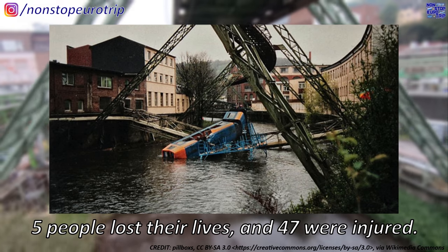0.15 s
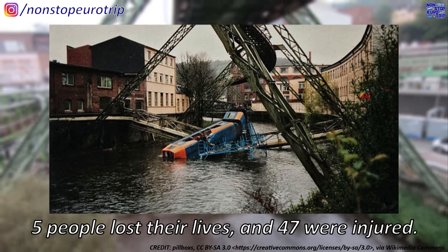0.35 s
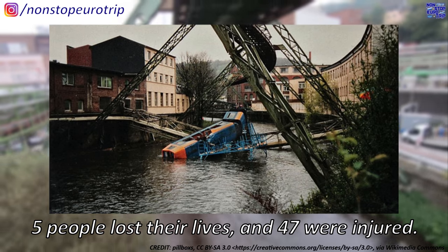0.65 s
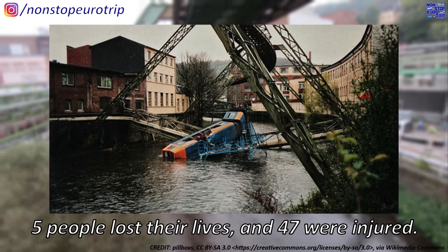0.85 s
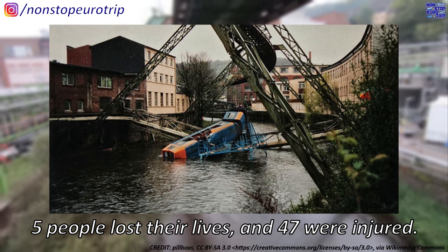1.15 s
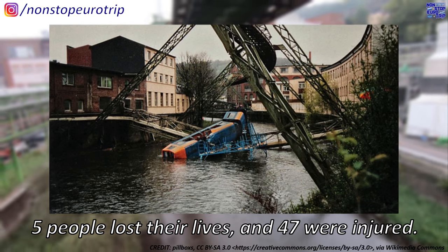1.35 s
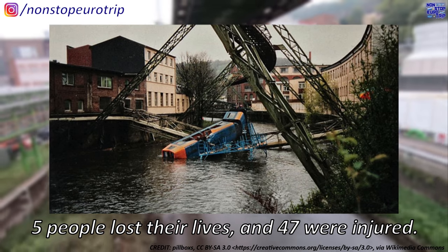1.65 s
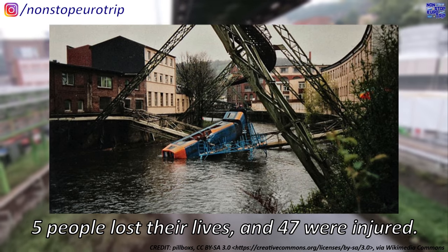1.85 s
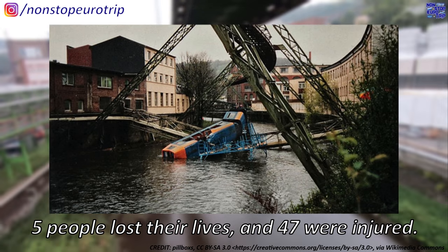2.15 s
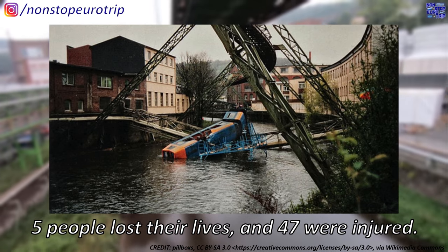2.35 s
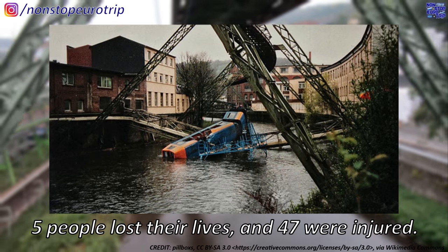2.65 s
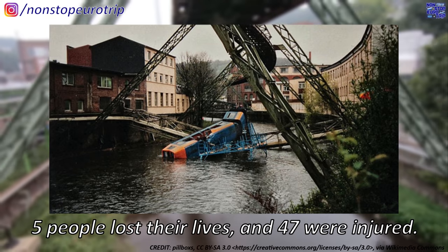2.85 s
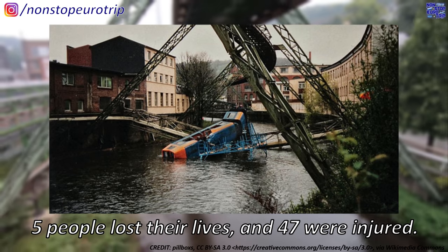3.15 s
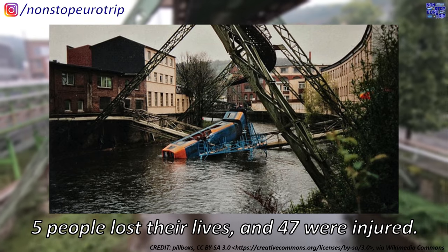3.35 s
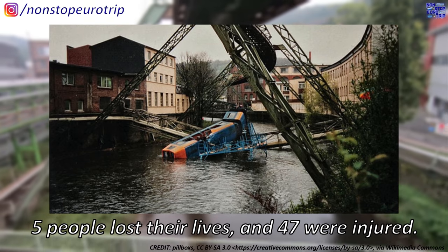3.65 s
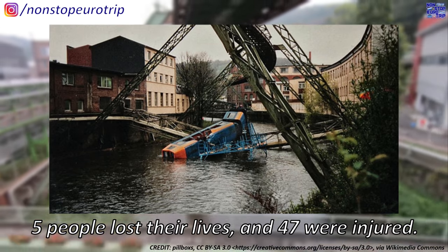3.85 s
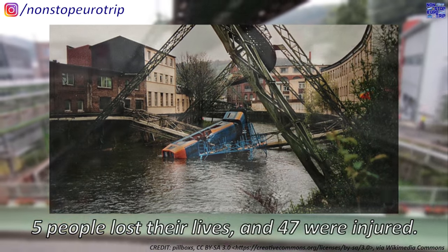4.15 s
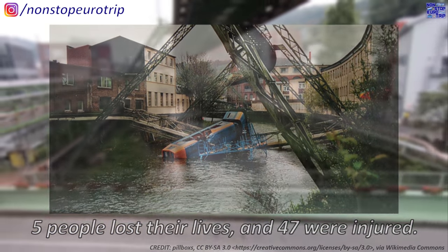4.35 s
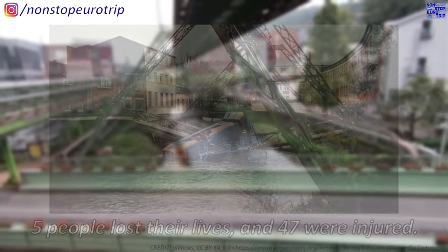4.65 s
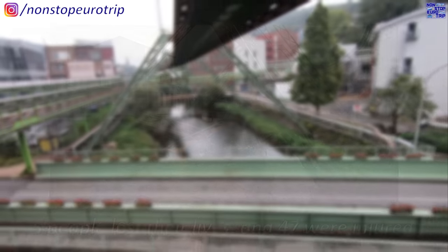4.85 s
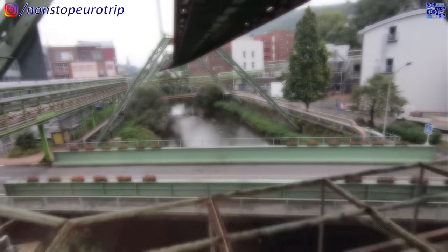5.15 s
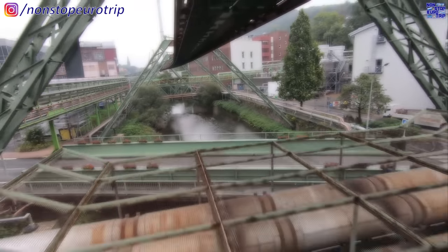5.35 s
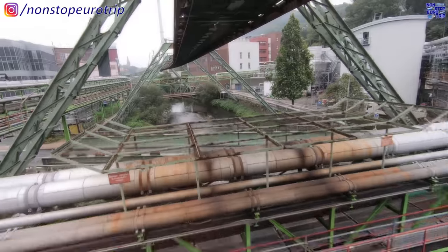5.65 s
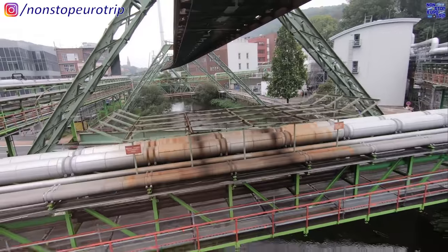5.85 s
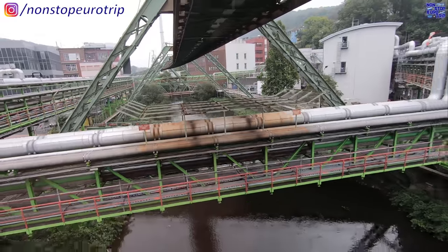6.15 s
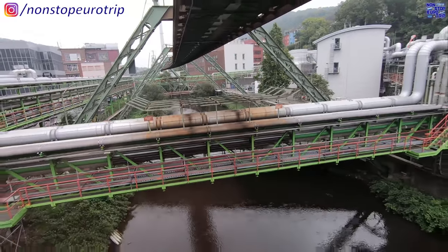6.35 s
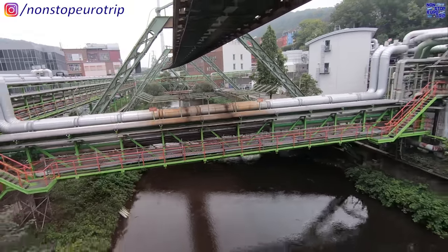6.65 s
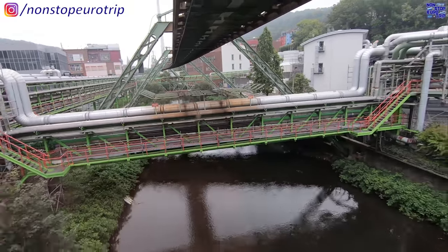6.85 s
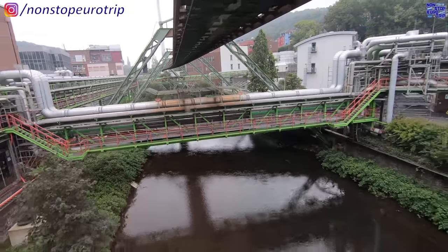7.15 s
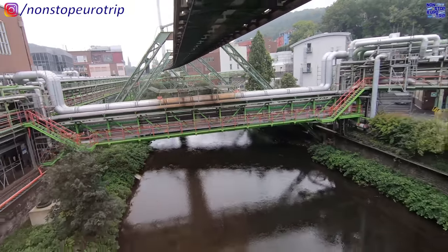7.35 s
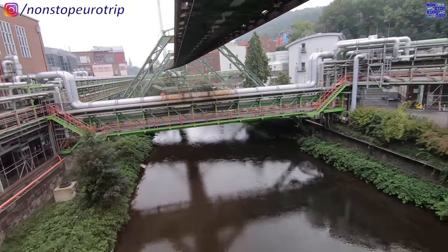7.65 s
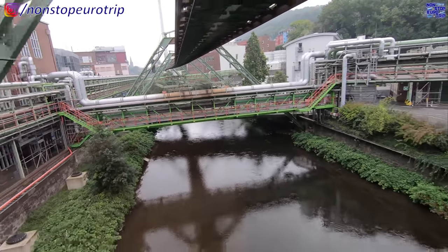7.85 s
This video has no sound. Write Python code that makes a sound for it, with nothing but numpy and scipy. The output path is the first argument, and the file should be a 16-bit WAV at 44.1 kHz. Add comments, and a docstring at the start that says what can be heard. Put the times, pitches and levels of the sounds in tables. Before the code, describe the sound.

Steady ride heard from within a hanging monorail car, microphones in the enclosed cabin. Deep bass boom and murky panel drone never stop, rising and falling with rough rail. Over them lie faint hiss, buzzing trim and a wavering high whine. Soft thuds, dull knocks and light ticks come irregularly, clustering before halfway; short high squeaks follow, then late plate clinks over rougher rolling.

```python
"""Inside a suspended monorail car at steady speed: from start to end, steel wheels on the rail overhead force the
hanging body's low modes to boom, panels drone, contacts buzz in the trim, and a motor whines thinly over a hiss.
Fittings tick, knock and thud from about 0.45 s; rubbing parts squeak at 1.8 s; the drone roughens near 2.3 s.
Knocks crowd from 3.5 to 4.1 s, squeaks follow to 4.7 s and one more at 5.9 s; near 7.5 s a loose plate clinks
as rougher rail passes. Noise drives resonances, sines make the tones; microphones and a limiter hear the sum."""
import sys
import numpy as np
from scipy import signal
from scipy.fft import rfft, irfft
from scipy.io import wavfile
from scipy.ndimage import uniform_filter1d, minimum_filter1d

SR = 44100
rng = np.random.default_rng(int(sys.argv[2]) if len(sys.argv) > 2 else 0)


def master(y):
    """Save y as 16-bit WAV."""
    cut = np.clip(np.atleast_2d(y).T, -1, 1)
    pcm = np.round(cut * 32767)  # scale
    wavfile.write(sys.argv[1], SR, pcm.astype(np.int16))


N = 353241
HZ = np.maximum(np.fft.rfftfreq(N, 1 / SR), 1)   # FFT bin frequencies, kept above zero for the logarithm

# Lowest resonances of the hanging body: centre_hz [Hz], width_hz [Hz], level_db [relative dB]
SWAY_MODES = [(18.7, 7, -9), (28, 10, -2), (41.7, 5.9, 0.5), (60.9, 19, -3), (75, 12, -10.5)]
# Booming resonances of the body: centre_hz [Hz], width_hz [Hz], level_db [relative dB]
BODY_MODES = [(95.1, 19.5, 3.5), (112, 5.7, 3.5), (135.5, 31, -6.5)]
# Resonances of the floor: centre_hz [Hz], width_hz [Hz], level_db [relative dB]
FLOOR_MODES = [(164.6, 18.5, -1), (187.6, 18.6, -2.5)]
# Resonances of the panels: centre_hz [Hz], width_hz [Hz], level_db [relative dB]
PANEL_MODES = [(230.7, 35, -5.5), (296.6, 29, -0.5), (326.4, 32, -4), (386.2, 36.5, -4.5), (444.5, 36, -10)]
# Resonances heard in the rolling noise: centre_hz [Hz], width_hz [Hz], level_db [relative dB]
ROLLING_MODES = [(517.5, 79, 5), (611, 46, 9), (688, 320, 3), (792, 280, -0.5), (960, 100, -12.5)]
# Course of the floor's hum: time_s [s], level_db [relative dB]
FLOOR_LEVEL = [(0.0, -21.5), (0.13, -37.5), (0.22, -26), (0.31, -35), (0.71, -24), (0.84, -32.5),
               (0.87, -30.5), (2.16, -23.5), (2.2, -16), (2.32, -25), (2.67, -21), (2.96, -30.5),
               (5.64, -29.5), (6.02, -26), (6.08, -32.5), (6.71, -27.5), (6.79, -35.5), (6.86, -20.5),
               (6.97, -36), (7.11, -21), (7.22, -32), (7.26, -24.5), (7.89, -31.5), (8.0, -52)]


def car_body():
    """Forced vibration: rail roughness drives each group of modes with noise; little passes above them."""
    drone_db, sway_db, boom_db, _ = rail_state()
    boom_lift, drone_lift, *_ = jolts()
    floor_db = in_time(FLOOR_LEVEL)[0] + 0.35 * boom_lift - 0.6
    panel_db = drone_db + drone_lift - 1.8 + 0.61 * drift(15)
    rolling_db = -47.5 + 0.79 * (drone_db - drone_db.mean() + drone_lift) + 0.53 * drift(2.6)
    # modes, skirt steepness, level [dB], throb per wheel turn [dB], own random surge [dB]
    groups = [(SWAY_MODES, 1.2, sway_db - 0.5, 1.2, 0.2),
              (BODY_MODES, 1.8, boom_db + boom_lift - 2.5, 1.1, 1.3),
              (FLOOR_MODES, 1.8, floor_db, 2.2, 1.1),
              (PANEL_MODES, 1.5, panel_db, 1.5, 1.2),
              (ROLLING_MODES, 2.2, rolling_db, 1.1, 0.9)]
    shared_surge_db = 0.54 * drift(26.0)   # uneven rail shakes all groups together
    out = 0
    for modes, steep, level_db, throb_db, surge_db in groups:
        mass_rolloff = 1 / (1 + (HZ / modes[-1][0] / 2) ** 4)
        vibration = heard(rng.standard_normal((2, N)), modes_gain(modes, steep) * mass_rolloff)
        swing_db = shared_surge_db + surge_db * drift(9.0) + throb_db * wheel_throb()
        out = out + amp(level_db + swing_db) * vibration
    return out


# State of the rail: time_s [s], then the levels it gives to drone_db, sway_db, boom_db, rattle_db [relative dB]
RAIL = [(0.0, -37.5, -18, -19, -60), (0.13, -38.5, -19.5, -19.5, -61.5), (0.93, -34.5, -18, -19.5, -57.5),
        (1.56, -32.5, -20, -15.5, -57), (1.87, -36, -19, -19, -56), (2.27, -31, -15.5, -15, -56),
        (2.78, -38.5, -21, -20, -60.5), (4.1, -37.5, -16.5, -21.5, -60), (4.32, -42.5, -18, -24.5, -62),
        (4.7, -34.5, -20, -13.5, -56.5), (4.99, -41, -20.5, -22, -63), (5.19, -36.5, -19.5, -20.5, -60.5),
        (5.44, -37.5, -19, -23, -60.5), (5.99, -38.5, -17.5, -24.5, -57.5),
        (6.24, -39.5, -20.5, -19, -59.5), (7.2, -36.5, -20.5, -21, -58), (7.44, -30.5, -18, -14.5, -56.5),
        (8.0, -43, -22.5, -25.5, -63.5)]


def rail_state():
    """Excitation by roughness: drone, sway, boom and rattle levels follow the rail along the ride."""
    return in_time(RAIL)


# Jolts over uneven spots: centre_s [s], length_s [s],
# then boom_lift_db, drone_lift_db, trim_lift_db, fine_lift_db [dB before each group's weighting]
JOLTS = [(0.285, 0.12, 2, 0, 7.5, 4), (0.529, 0.12, 6.5, 5.5, 4, 0), (0.657, 0.11, 2.5, 5.5, 1.5, 2),
         (1.596, 0.19, -4, -3, 2, 5), (1.78, 0.19, 3, 0.5, 5.5, 3.5), (2.046, 0.11, 2, 1.5, 5, 1),
         (2.131, 0.084, 3, 5, 0, -5), (2.257, 0.087, 1.5, -6, 1, 6), (2.404, 0.096, -11, -2, 4, -2),
         (2.7, 0.19, -2, -2.5, 0, -3), (2.732, .09, 2, -2, 4, 5), (2.868, 0.069, 4, 2.5, 2.5, 2),
         (3.33, 0.11, -0.5, 3.5, -0.5, 3), (3.408, 0.39, 2.5, -0.5, 5.5, 2.5), (3.765, 0.067, 5, -4, 6, 3),
         (3.913, 0.15, 4.5, 8.5, 3, -1), (4.01, 0.29, 1, 1.5, 6.5, 5), (4.15, 0.08, -1, 1, 7, 5),
         (4.678, 0.26, -0.5, 5, 3.5, 9.5), (5.17, 0.144, 2.5, -1.5, 2, 2), (5.838, 0.18, 9, 6.5, 7, 4),
         (5.979, 0.18, 9.5, 8.5, 4, 4), (6.774, 0.19, 3.5, 1.5, 4.5, 4), (6.962, 0.08, 0.5, 0, -12, 8.5),
         (7.074, 0.15, -0.5, 3.5, 5.5, 3), (7.34, 0.16, 3.5, -1, 5.5, 6), (7.505, 0.26, -3.5, -1, 6, 3),
         (7.595, 0.17, 6, 2, 0, 4)]


def jolts():
    """Transient excitation: each jolt raises or lowers levels in a raised-cosine hump; one track per lift."""
    t = np.arange(0, N, 64) / SR   # a coarse time grid is enough for smooth humps
    rows = np.array(JOLTS)
    centre_s, length_s = rows[:, :1], rows[:, 1:2]
    humps = np.cos(np.pi * np.clip((t - centre_s) / length_s, -0.5, 0.5)) ** 2
    return [np.interp(np.arange(N) / SR, t, lift) for lift in rows[:, 2:].T @ humps]


WHEEL_HZ = 4.52           # turns a second of a slightly out-of-round wheel
WHEEL_HIGH_S = 0.0067     # first moment its high side meets the rail


def wheel_throb():
    """Periodic forcing: an out-of-round wheel swings the drive from -1 to 1 once per turn."""
    return np.cos(2 * np.pi * WHEEL_HZ * (np.arange(N) / SR - WHEEL_HIGH_S))


# Resonances of the trim: centre_hz [Hz], width_hz [Hz], level_db [relative dB]
TRIM_MODES = [(1110, 720, 2), (1440, 390, -10), (2220, 1230, -6)]
# Resonances of the chirring fittings: centre_hz [Hz], width_hz [Hz], level_db [relative dB]
CHIRR_MODES = [(2920, 1800, 20.5), (3800, 800, -26.5)]
# Resonances of the fine rattle: centre_hz [Hz], width_hz [Hz], level_db [relative dB]
FINE_MODES = [(5330, 6000, -0.5), (7050, 2300, 0), (9250, 1500, -3.5)]


def fittings():
    """Random impact excitation: dense small contacts ring the trim, in clumps, with rail and jolts."""
    rattle_db = rail_state()[3]
    swing_db = rattle_db - rattle_db.mean()
    *_, trim_lift, fine_lift = jolts()
    fine_db = -73 + 0.7 * swing_db + fine_lift + 0.68 * wheel_throb()
    # modes, contacts a second, spread of contact sizes [dB], level [dB]
    groups = [(TRIM_MODES, 300, 3.2, -60.5 + 1.1 * swing_db + trim_lift),
              (CHIRR_MODES, 400, 3.2, -68 + 0.64 * swing_db + 0.64 * fine_lift),
              (FINE_MODES, 500, 4.0, fine_db)]
    out = 0
    for modes, per_s, spread_db, level_db in groups:
        ringing = heard(contacts(per_s, spread_db), modes_gain(modes, 1.74))
        clumps_db = 1.9 * drift(38) + 0.5 * drift(15.0)
        out = out + amp(level_db + clumps_db) * ringing
    return out


def contacts(per_s, spread_db):
    """Shot noise: random contacts of uneven size over a smooth noise bed."""
    sizes = amp(spread_db * np.minimum(rng.exponential(1, N), 4))
    touch = 1 + sizes * (rng.random(N) < per_s / SR)
    return rng.standard_normal((2, N)) * touch


# Single dull knocks of fittings: start_s [s], level_db [dB before trim], pitch_hz [Hz]
KNOCKS = [(0.45, -36, 1130), (1.5294, -37, 1210), (2.016, -36, 1110), (2.4059, -39, 1150),
          (2.8499, -38.5, 1180), (3.458, -33.5, 900), (3.766, -35.5, 1000), (3.958, -32, 850),
          (4.148, -40, 1240), (5.945, -34, 1000), (6.5605, -41, 1210), (7.0753, -41, 1310),
          (7.3298, -40, 1220)]
# Light ticks of small metal parts: start_s [s], level_db [dB before trim]
TICKS = [(0.4494, -51), (1.5874, -50), (1.642, -56), (1.7894, -50), (2.0294, -57), (2.0697, -54),
         (2.17, -49), (2.2483, -52), (2.4039, -50), (2.4977, -51), (2.645, -54), (2.8494, -56),
         (3.465, -55), (3.5425, -47), (3.7693, -49), (4.1475, -47), (4.6, -53), (4.625, -50), (4.655, -51),
         (4.69, -54), (5.902, -49), (5.9968, -45), (6.9594, -57), (7.3257, -45), (7.4245, -45),
         (7.4694, -48), (7.5368, -46), (7.6001, -54)]
TICK_HZ = 7000
# Clinks of a loose plate: start_s [s], level_db [dB before trim]
CLINKS = [(7.4944, -44), (7.5088, -44), (7.5293, -49), (7.5354, -50)]
# What the loose plate rings with: centre_hz [Hz], width_hz [Hz], level_db [relative dB]
PLATE_MODES = [(1970, 42, 2), (2050, 45, 2.5), (2210, 52, 3)]
# Thuds from the rail into the panels: start_s [s], level_db [dB before trim]
THUDS = [(0.53, -16), (0.89, -24), (1.067, -24), (1.287, -28), (1.688, -36), (1.961, -23), (2.178, -20),
         (2.406, -20.5), (2.849, -30), (3.813, -35), (3.936, -28), (4.592, -20.5), (6.449, -22),
         (6.544, -33), (7.061, -29), (7.525, -33)]


def knocks():
    """Impact and free decay: dull knocks and light ticks as noise bursts, clinks and thuds as struck modes."""
    dull = bursts(KNOCKS, t60=0.061, width=0.9, wide=0.49, trim_db=-5.0, rise_s=0.006, grain_db=2.5)
    clinks = struck(CLINKS, PLATE_MODES, soft_hz=5000, trim_db=-7)
    thuds = struck(THUDS, PANEL_MODES, soft_hz=600, trim_db=-4.0)
    tick_rows = [(s, db, TICK_HZ) for s, db in TICKS]
    ticks = bursts(tick_rows, t60=0.065, width=0.31, wide=0.75, trim_db=-9, rise_s=0.0042, grain_db=4.0)
    return dull + clinks + thuds + ticks


def bursts(rows, t60, width, wide, trim_db, rise_s, grain_db):
    """Exponential decay: each row (s, dB, Hz) is a noise band, width octaves to each side, dying by 60 dB in t60."""
    t = np.arange(6000) / SR
    noise = rng.standard_normal((len(rows), 2, len(t)))
    grains = rng.standard_normal((len(rows), 1, len(t) // 60)).repeat(60, axis=2)
    noise = noise * amp(grain_db * grains)   # crackles in short grains
    out = np.zeros((2, N + len(t)))
    for (s, db, hz), (mid, side) in zip(rows, noise):
        band = signal.butter(2, [hz * 2 ** -width, hz * 2 ** width], "band", fs=SR, output="sos")
        pair = rms_one(signal.sosfilt(band, [mid + wide * side, mid - wide * side]))
        envelope = amp(db + trim_db - 60 * t / t60) * np.minimum(t / rise_s, 1)
        start = round(s * SR)
        out[:, start:start + len(t)] += pair * envelope
    return out[:, :N]


def struck(rows, modes, soft_hz, trim_db):
    """Modal impulse response: each row (s, dB) strikes every mode with a soft blow of its own strength."""
    s, db = np.transpose(rows)
    luck_db = rng.normal(0, 1.2, (len(s), len(modes)))
    out = np.zeros(N)
    for k, (hz, width, level_db) in enumerate(modes):
        blows = np.full(N, 1e-18)   # a tiny floor instead of exact silence
        blows[(s * SR).astype(int)] = amp(db + level_db + trim_db + luck_db[:, k])
        r, w = np.exp(-np.pi * width / SR), 2 * np.pi * hz / SR   # pole radius and angle
        ringing = signal.lfilter([0, np.sin(w)], [1, -2 * r * np.cos(w), r * r], blows)
        out += ringing * (-1) ** k   # neighbouring modes in opposite sign
    return signal.sosfilt(signal.butter(2, soft_hz, fs=SR, output="sos"), out)


# Brief squeaks: start_s [s], length_s [s], first_hz [Hz], last_hz [Hz], level_db [dB of peak amplitude before raggedness]
SQUEAKS = [(1.779, 0.13, 3190, 3110, -58.5), (3.95, 0.065, 3230, 3300, -59), (4.33, 0.035, 3220, 3270, -57),
           (4.522, 0.085, 3120, 3180, -59.5), (4.607, .05, 3180, 3300, -59),
           (5.857, 0.097, 3310, 3170, -59)]


def squeaks(rough=0.39, jitter=0.6):
    """Friction-driven tone: rubbing parts sing briefly in a glide, ragged in level and phase (jitter, radians)."""
    t = np.arange(N) / SR
    out, ragged = np.zeros(N), jitter * drift(90)
    for s, length, first_hz, last_hz, db in SQUEAKS:
        part = np.clip((t - s) / length, 0, 1)
        phase = 2 * np.pi * np.cumsum(first_hz + (last_hz - first_hz) * part) / SR
        swell = np.sqrt(np.sin(np.pi * part).clip(0))
        out += amp(db) * swell * np.sin(phase + ragged)
    return out * (1 + rough * np.array([drift(45), drift(45)]))


SHAFT_HZ, WHINE_ORDER = 56.07, 52   # shaft turns a second; multiple of it that whines
# Motor whine, swelling and fading: time_s [s], level_db [dB rms before flutter and waver]
WHINE = [(0.02, -56), (0.06, -60.5), (0.35, -70), (0.4, -55), (0.49, -68), (0.55, -58), (0.73, -66),
         (0.77, -56), (0.89, -68.5), (1.2, -64.5), (1.22, -73), (1.35, -72), (1.42, -62), (1.69, -68.5),
         (1.75, -62), (2.17, -72), (2.24, -61), (2.44, -76), (2.51, -61.5), (2.71, -67.5), (3.09, -61),
         (3.2, -69), (3.29, -54), (3.33, -67), (3.37, -61), (3.49, -68), (3.53, -74), (3.55, -63),
         (3.86, -61.5), (3.91, -80), (3.95, -60), (4.09, -56), (4.13, -70), (4.18, -52), (4.22, -62.5),
         (4.4, -72), (4.49, -60), (4.6, -70), (5.0, -63), (5.09, -68), (5.15, -57), (5.24, -70),
         (5.93, -61), (6.07, -71), (6.09, -59.5), (6.35, -71), (6.53, -70), (6.58, -59), (6.8, -73.5),
         (6.84, -60), (6.93, -67), (7.02, -57), (7.04, -67), (7.27, -63), (7.46, -69), (7.49, -65),
         (7.71, -69), (7.84, -65), (7.96, -68), (8.0, -65)]
# Twelfth multiple of the shaft rate: time_s [s], level_db [dB rms before waver]
DRONE = [(0.03, -61), (0.23, -58), (0.29, -62), (0.65, -47), (0.74, -56), (1.69, -54), (2.07, -59),
         (2.16, -45), (2.18, -57), (2.83, -59), (2.87, -41), (2.92, -57), (3.6, -60.5), (4.0, -52),
         (4.33, -65), (4.67, -48), (4.71, -57), (5.33, -50), (5.89, -55), (5.98, -49), (6.02, -60),
         (6.56, -53), (7.22, -59.5), (7.31, -52.5), (7.73, -52), (8.0, -56)]
# Weaker multiples of the shaft rate: multiple [times shaft rate], level_db [dB rms before waver]
ORDERS = [(13, -73), (14, -68), (15, -63.5), (30, -74.5), (48, -75.5), (64, -83)]


def motor():
    """Harmonic series of rotation: multiples of the shaft rate, each wavering on its way through the body."""
    t = np.arange(N) / SR
    flutter_db = 1.4 * drift(35)
    # multiple, gain, depth of wavering
    lines = [(WHINE_ORDER, amp(in_time(WHINE)[0] + flutter_db), 0.2), (12, amp(in_time(DRONE)[0]), 0.3)]
    lines += [(multiple, amp(db), 0.9) for multiple, db in ORDERS]
    out = np.zeros((2, N))
    for multiple, gain, waver in lines:
        apart = 0.39 * drift(7.9)   # the two channels drift apart in phase
        wander = 2.8 * waver * drift(4.1) + 0.62 * drift(10)
        phase = round(multiple) * 2 * np.pi * SHAFT_HZ * t + wander + np.array([apart, -apart])
        out += np.sqrt(2) * gain * (1 + waver * drift(16.0)) * np.sin(phase)
    return out


# Spectrum of the steady hiss of air and wheels: pitch_hz [Hz], density_db [relative dB per Hz]
HISS = [(700, -13.5), (950, -4.5), (1300, -2), (1800, -6.5), (2400, -14), (2900, -7), (3600, -18),
        (5000, -20), (7500, -20.5), (10000, -25), (13000, -33.5)]
HISS_DB = -60.5   # rms level about which it flutters


def hiss():
    """Broadband random noise: a smooth bed of air and wheels, barely fluttering."""
    bed = heard(rng.standard_normal((2, N)), amp(at_hz(HISS, -99)))
    return amp(HISS_DB + 0.62 * drift(22)) * bed


# Likeness of the two microphones: pitch_hz [Hz], correlation [-1 to 1]
LIKENESS = [(30, 1), (80, 1), (200, 1), (400, 0.94), (700, 0.67), (1100, 0.087), (1700, -0.12), (2900, .73),
            (4200, .56), (5500, .11), (10000, 0.01)]
# Balance of the two microphones: pitch_hz [Hz], left_minus_right_db [dB]
LEFT_DB = [(100, -0.75), (450, 0.5), (660, -7), (800, -0.5), (2400, 0), (10000, 0.5)]


def heard(source, gain):
    """Spatial coherence: two unrelated drives, coloured and mixed by mid and side; mid rms 1."""
    mid, side = rfft(source) * gain
    alike = np.clip(at_hz(LIKENESS), -0.999, 0.999)
    sign = np.array([[1], [-1]])   # left, right
    spectra = np.sqrt(1 + alike) * mid + sign * np.sqrt(1 - alike) * side
    pair = irfft(spectra * amp(sign * at_hz(LEFT_DB) / 2), N)
    return pair / np.std(pair.mean(axis=0))


def modes_gain(modes, steep):
    """Resonance curves: powers of the modes summed; steep above 1 darkens the skirts."""
    power = 0
    for hz, width, db in modes:
        detuning = (HZ ** 2 - hz ** 2) / (HZ * width)
        power = power + amp(db) ** 2 / (1 + detuning ** 2) ** steep
    return np.sqrt(power)


def drift(rate):
    """Low-passed random process: slow noise of rms 1, falling off above rate in Hz."""
    return rms_one(irfft(rfft(rng.standard_normal(N)) / (1 + (HZ / rate) ** 2), N))


def amp(db):
    """Decibel law: dB to amplitude gain."""
    return 10 ** (np.asarray(db) / 20)


def rms_one(x):
    """Mean-square normalization: scaled to rms 1."""
    return x / np.sqrt(np.mean(x ** 2) + 1e-20)


def in_time(rows):
    """Linear interpolation in time: columns of a curve table, one value per sample."""
    s, *columns = np.transpose(rows)
    return [np.interp(np.arange(N) / SR, s, c) for c in columns]


def at_hz(points, beyond=None):
    """Interpolation over log frequency: a spectrum table read at every FFT bin."""
    hz, value = np.transpose(points)
    return np.interp(np.log(HZ), np.log(hz), value, beyond, beyond)


def scene():
    """Superposition: all sources summed, already in stereo."""
    return car_body() + hiss() + fittings() + knocks() + squeaks() + motor()


MIC_TOP_HZ, MIC_NOISE_DB = 10530, -85.5   # microphone roll-off; rms of its noise before limiting
LIMIT_DB, RELEASE_DB_PER_S, ATTACK_S = -7.7, 140, 0.0036   # limiter threshold, recovery rate, look-ahead
CUTOFF_HZ = 15700   # stopband edge of the final low-pass


def record(dry):
    """Peak limiting: looking a moment ahead, both channels are pulled down under loud swings; the top is cut."""
    dry = dry * np.minimum(np.arange(N) / (0.006 * SR), 1)   # a short fade-in
    dry = signal.sosfilt(signal.butter(12, MIC_TOP_HZ, fs=SR, output="sos"), dry)   # microphones fall off steeply
    dry = dry + amp(MIC_NOISE_DB) * rng.standard_normal((2, N))
    over_db = np.maximum(20 * np.log10(np.abs(dry).max(axis=0) + 1e-9) - LIMIT_DB, 0)
    slope = RELEASE_DB_PER_S * np.arange(N) / SR
    held_db = np.maximum.accumulate(over_db + slope) - slope   # peaks recover at a constant rate
    span = 2 * round(ATTACK_S * SR) + 1
    ahead_db = -minimum_filter1d(-held_db, span)   # running maximum, centred, so it acts early
    cut_db = uniform_filter1d(uniform_filter1d(ahead_db, span // 2), span // 2)
    return signal.sosfilt(signal.cheby2(10, 60, CUTOFF_HZ, fs=SR, output="sos"), dry * amp(-cut_db))


dry = scene()
out = record(dry)
master(out)
```